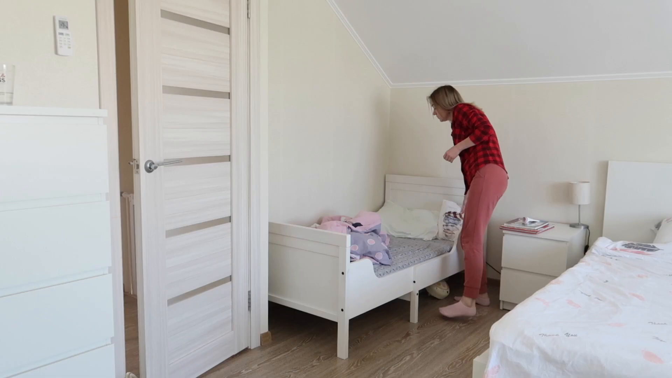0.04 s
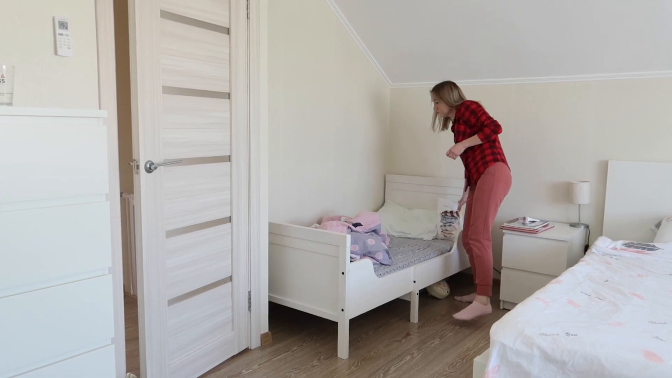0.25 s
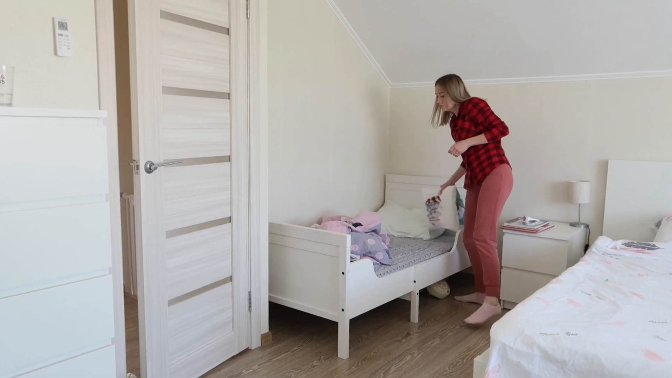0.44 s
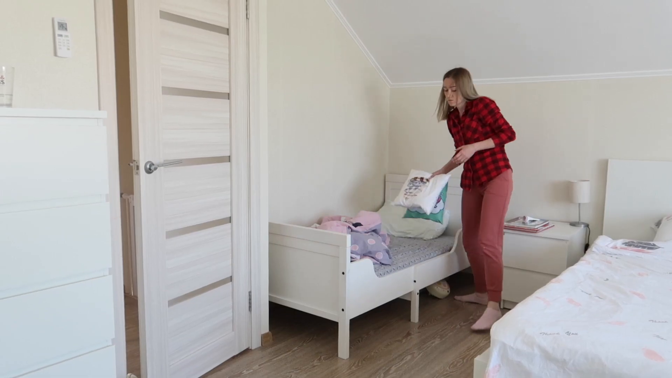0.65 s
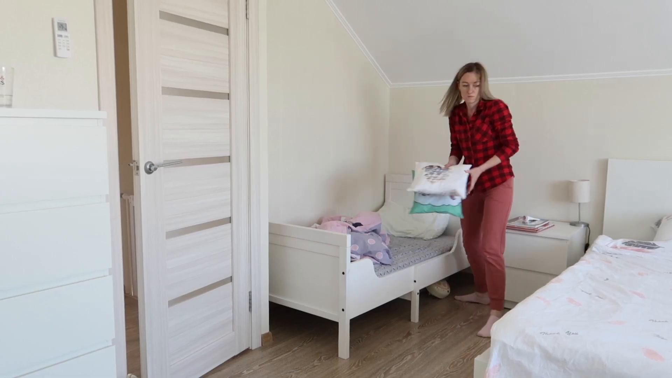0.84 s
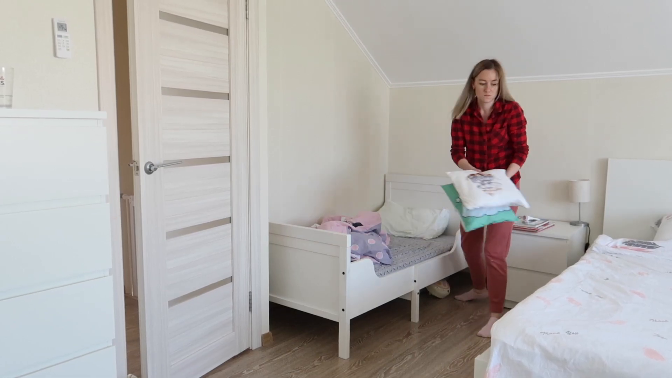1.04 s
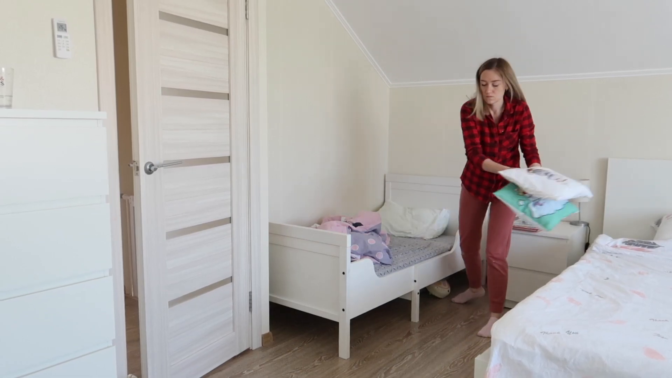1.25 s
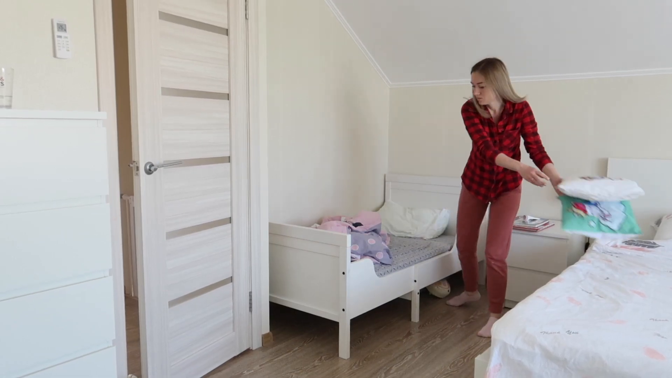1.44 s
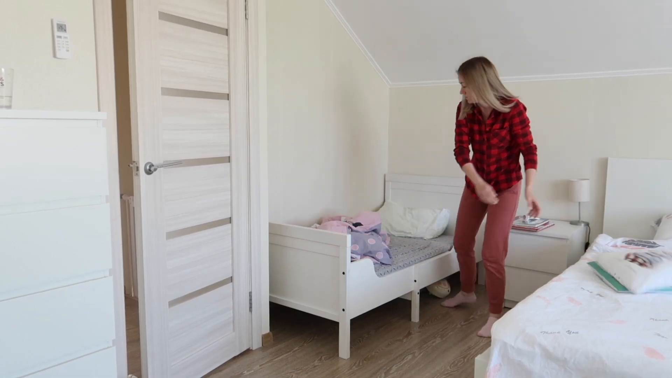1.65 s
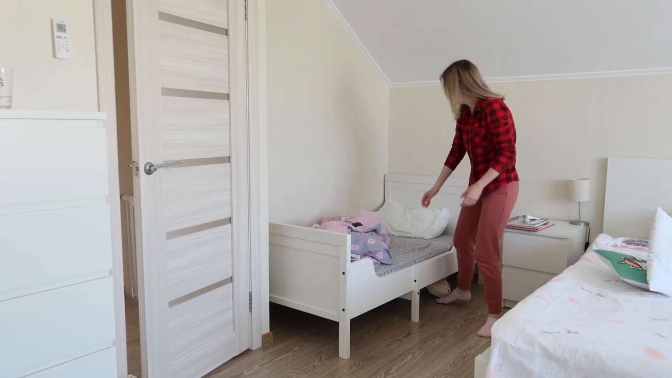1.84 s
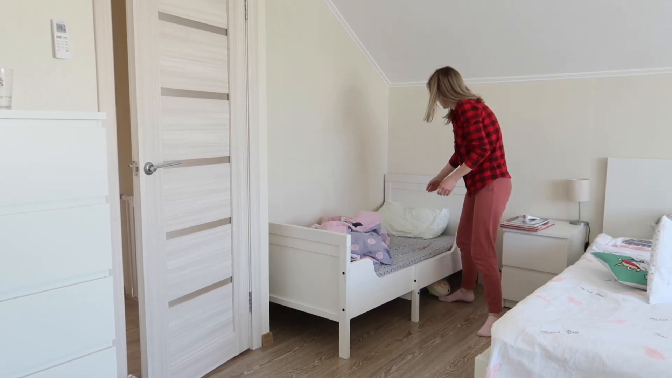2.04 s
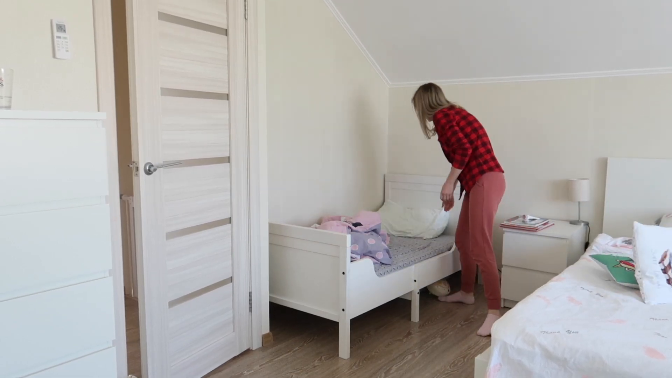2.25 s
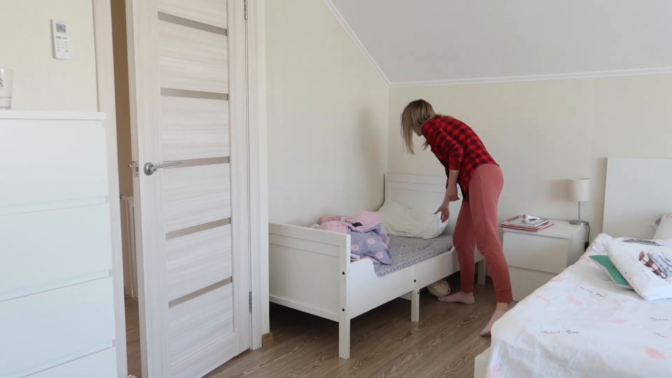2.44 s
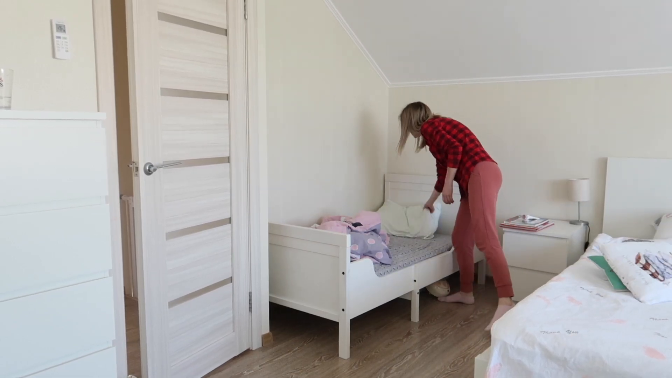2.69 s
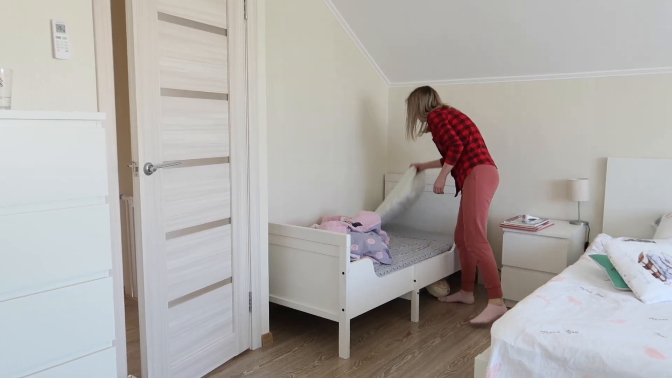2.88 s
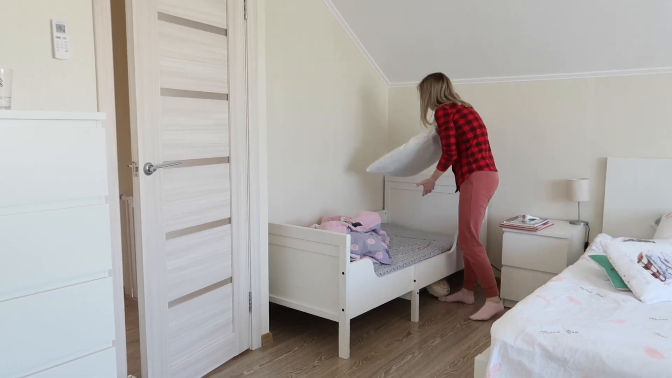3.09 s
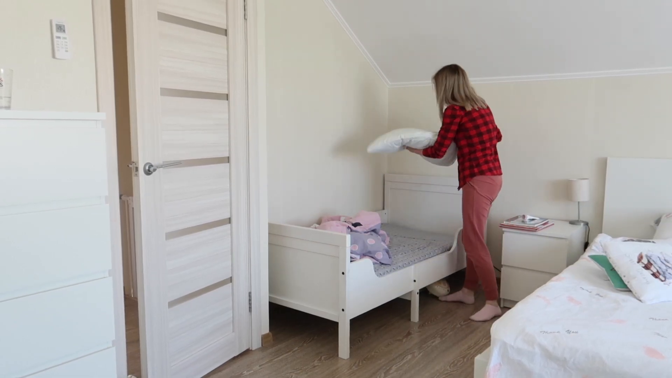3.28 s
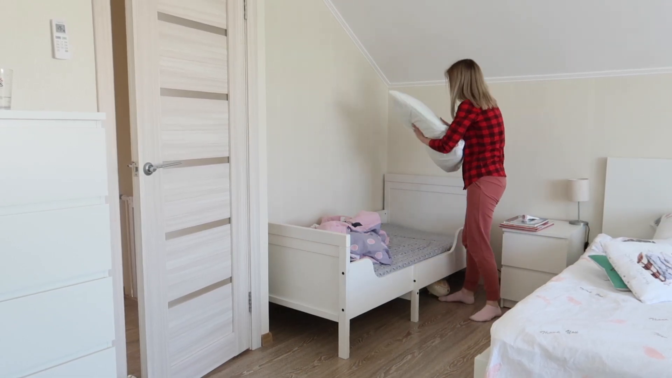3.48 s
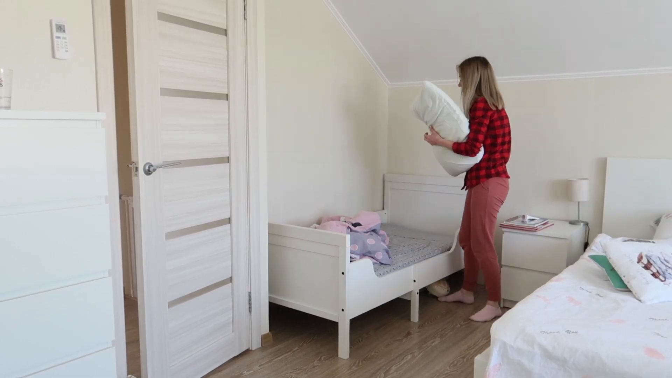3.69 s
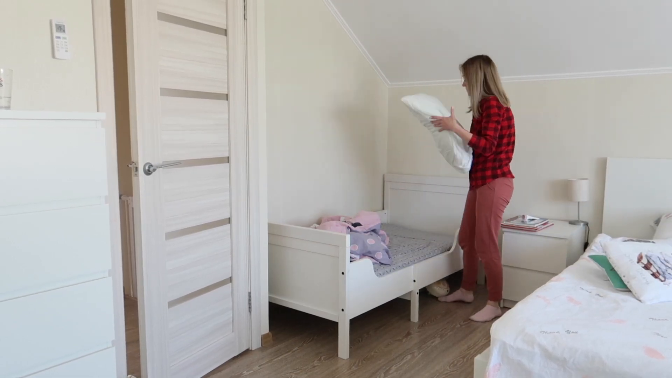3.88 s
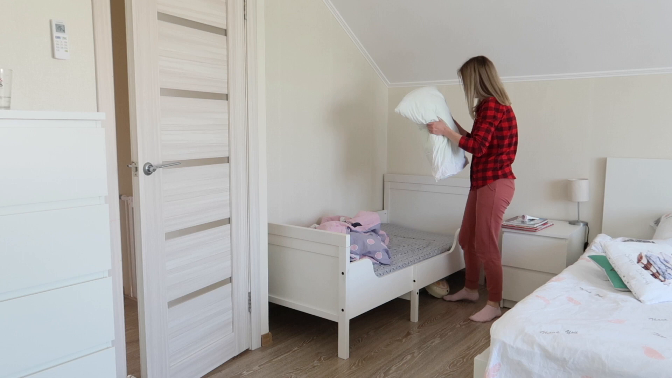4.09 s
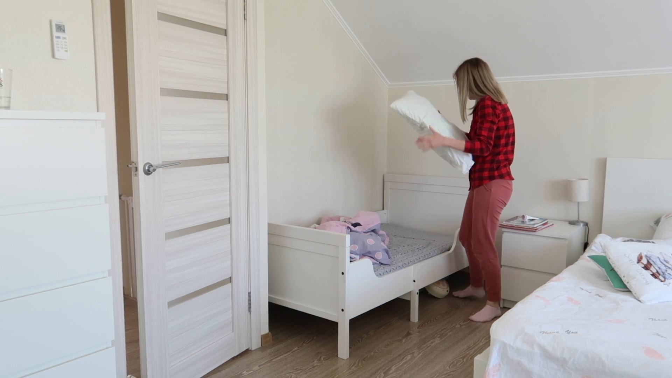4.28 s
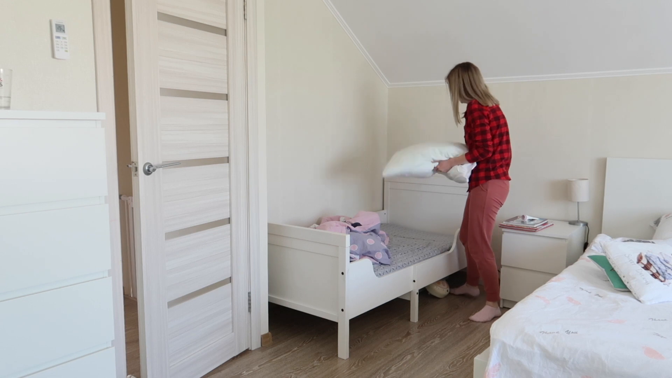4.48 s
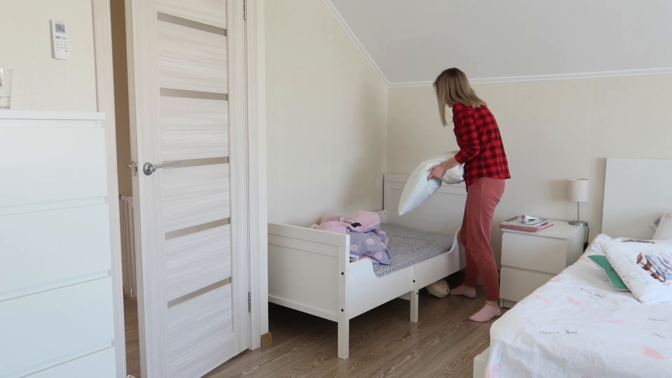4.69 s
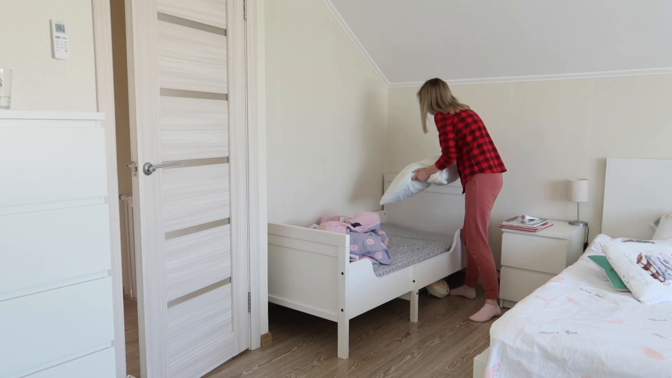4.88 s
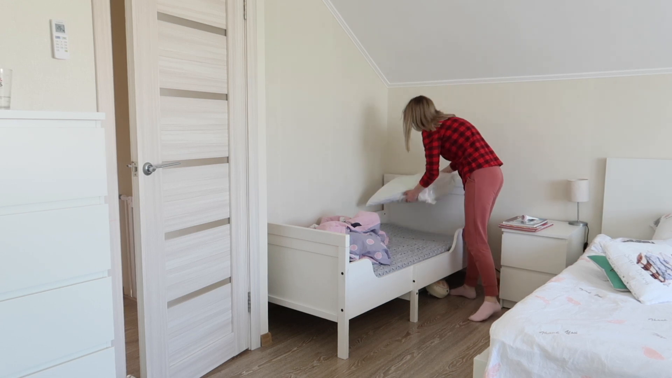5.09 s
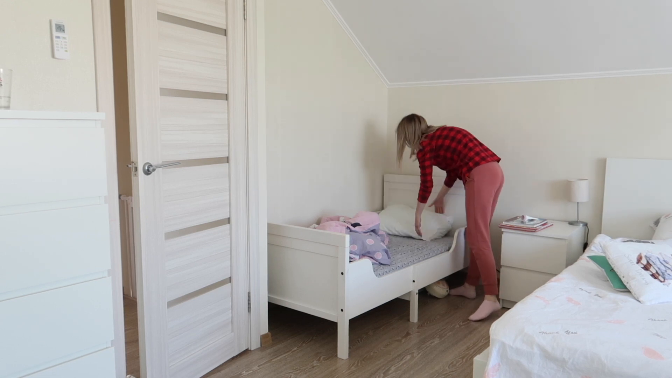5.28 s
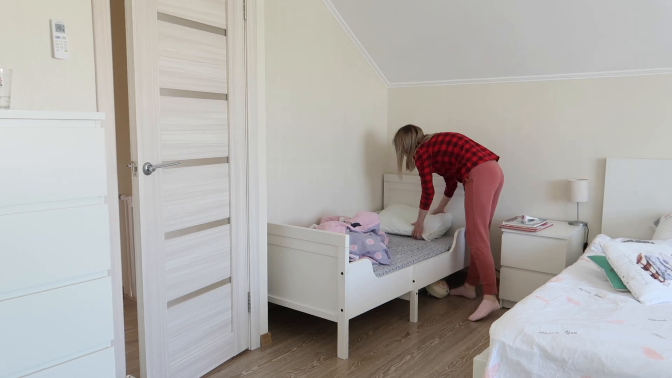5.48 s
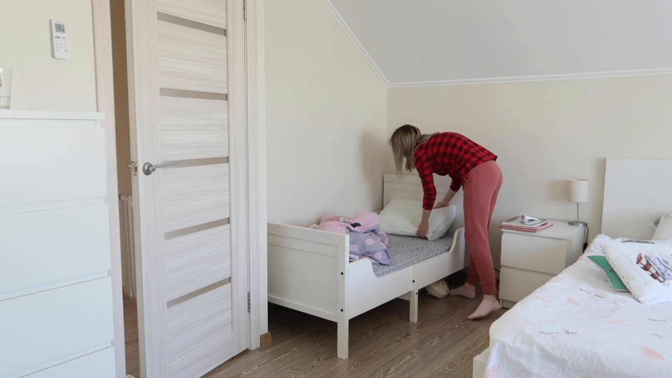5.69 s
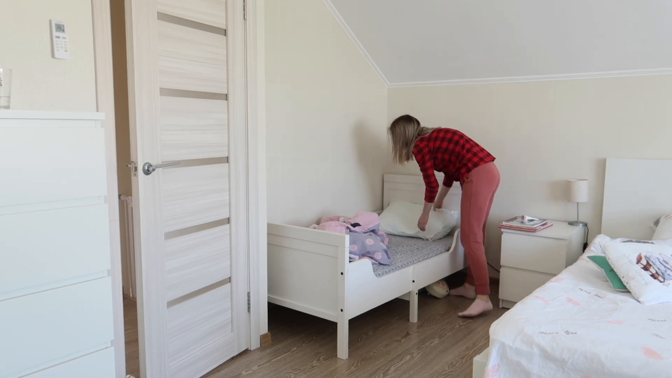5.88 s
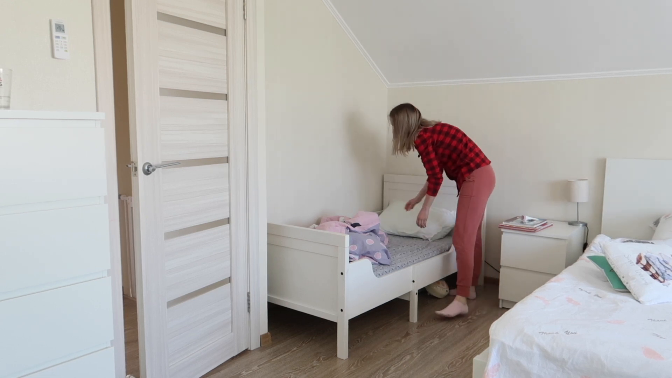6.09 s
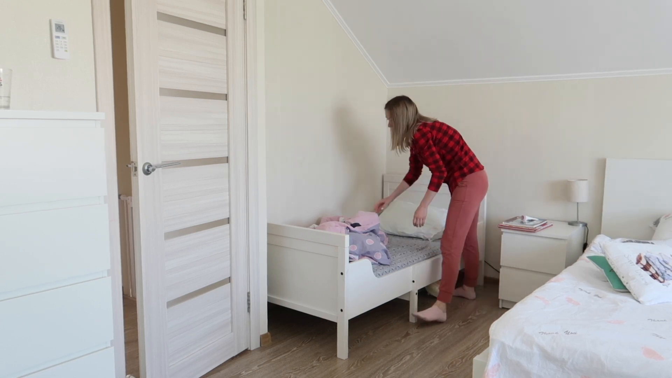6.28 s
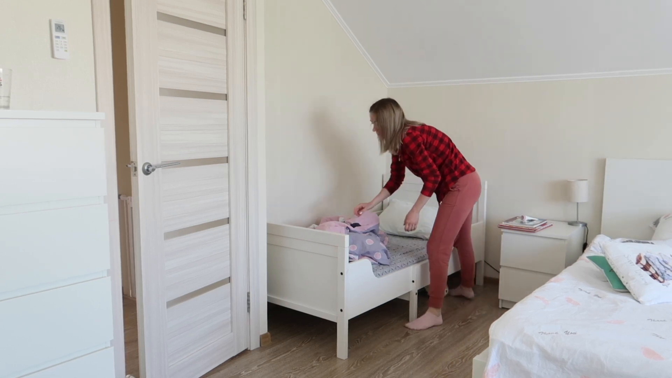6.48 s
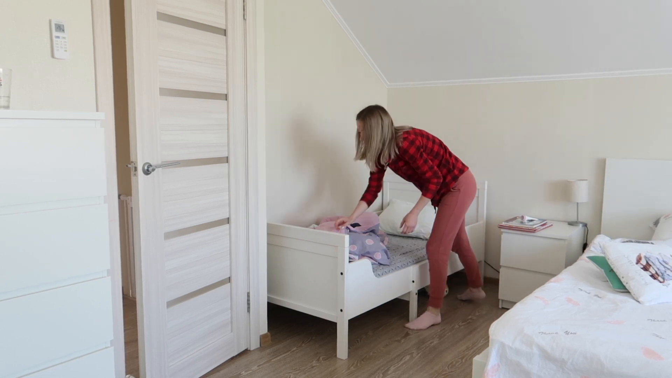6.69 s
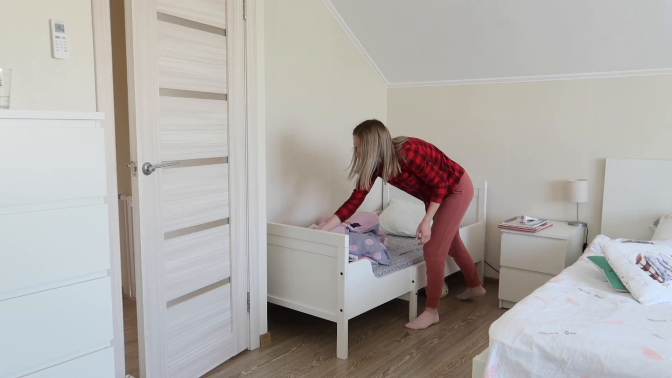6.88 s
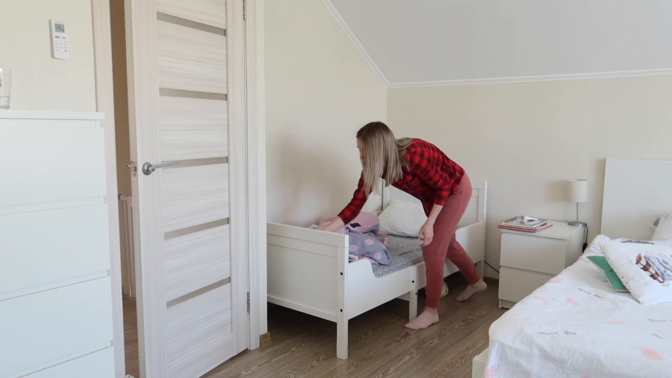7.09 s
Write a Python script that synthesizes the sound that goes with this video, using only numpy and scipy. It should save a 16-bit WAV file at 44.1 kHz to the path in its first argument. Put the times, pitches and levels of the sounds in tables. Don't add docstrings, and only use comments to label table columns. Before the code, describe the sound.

Bed covers hiss and crumple as someone makes beds, dropping and pressing pillows with dull thumps, fabric snaps and low thuds on boards.

```python
import sys
import numpy as np
from scipy import signal
from scipy.fft import rfft, irfft, next_fast_len
from scipy.io import wavfile
from scipy.ndimage import uniform_filter1d

SR = 44100
rng = np.random.default_rng(int(sys.argv[2]) if len(sys.argv) > 2 else 0)


def invert_db(x):
    u = np.asarray(x, float) / 20
    return 10 ** u


def transcribe(u):
    v = np.clip(np.atleast_2d(u).T, -1, 1)
    q = np.round(v * 32767).astype(np.int16)
    wavfile.write(sys.argv[1], SR, q)


N = 314962

# freq_hz, density_db
HUM_SPECTRUM = [(14, -13), (30, -4), (50, -4), (70, -9), (105, 4), (270, -10), (500, -9.5), (1200, -18.5),
                (2400, -19), (5000, -26.5), (10000, -35.5), (15400, -42.5)]
# freq_hz, density_db
HISS_SPECTRUM = [(35, -44), (60, -11), (155, 6), (231, 8), (271, 10.5), (403, 9.5), (671, 5), (3920, -4),
                 (11700, -18), (15400, -29)]
HUM_DB, HISS_DB = -53.5, -56
# pitch_hz, width_hz, level_db, drift_db_per_s
DRONES = [(264.4, 10.4, -57.5, -1.96), (197.5, 9.3, -69.5, -0.1), (876, 13, -64.5, -1.8),
          (425, 6.3, -69, -0.7)]
# time_s, level_db
SWAY = [(0.0, -62), (0.36, -62), (1.15, -55), (1.39, -58), (1.93, -56.5), (2.64, -58), (3.36, -64),
        (3.96, -60), (4.39, -61), (5.05, -68), (5.55, -48), (6.1, -68), (6.38, -60), (6.56, -45.5),
        (7.04, -60.5), (7.14, -60)]

# freq_hz, density_db
FIBRE_SPECTRUM = [(500, -53), (1300, -6), (2500, -2.5), (4200, -8), (6000, -15), (9000, -43)]
# freq_hz, density_db
SHEEN_SPECTRUM = [(3500, -7), (6000, 2), (8000, -1.5), (12000, -14), (14000, -54)]
# time_s, hiss_db, tautness_db, bulk_db
DRAG = [
    (0.0, -43.5, -32, -3),
    (0.09, -48.5, -7, 1.5),
    (0.15, -45.5, -6, 4),
    (0.22, -41.5, -5.5, -0.5),
    (0.33, -45.5, -2, 0.5),
    (0.42, -45, -2, -2.5),
    (0.5, -45.5, -4, -9),
    (0.53, -54.5, -10, 13),
    (0.6, -67, -9, 5),
]
# peak_s, hiss_db, length_s, tautness_db, bulk_db
STROKES = [(0.588, -57, 0.08, -7, 6.5), (0.745, -59.5, 0.28, -14, 2), (0.924, -56.5, 0.15, -12, 3),
           (1.015, -56, 0.14, -11, 3.5), (1.2, -59, 0.44, -13, 2.5), (1.42, -53.5, 0.17, -10, 2.5),
           (2.25, -64, 0.24, -15, 8), (2.452, -64, 0.5, -14, 4.5), (2.717, -51, 0.12, -16, 6.5),
           (2.842, -53.5, 0.18, -11, 4.5), (2.938, -56.5, 0.14, -15, 4.5), (3.182, -61.5, 0.49, -8, 6),
           (3.934, -59, 0.14, -20, 6), (4.025, -59, 0.23, -17, 7), (4.266, -53.5, 0.18, -16, 2),
           (4.455, -53.5, 0.054, -12, 11), (5.43, -56, .03, -10, -1), (4.607, -52.5, 0.093, -12, 6.5),
           (4.94, -61, 0.11, -11, 3), (5.217, -57.5, 0.26, -7.5, 3.5), (5.307, -49, 0.094, -13, 7),
           (5.585, -58, 0.2, -7.5, 10.5), (5.815, -57.5, 0.32, -4.5, 2.5), (6.576, -53.5, 0.063, -24, -2),
           (6.688, -51, 0.16, -17, -2), (7, -60, 0.054, -20, 7)]
STROKE_RISE_SHARE, STROKE_SHARPNESS = 0.41, 1.38
# start_s, hiss_db, bulk_db
SETTLES = [
    (1.7, -57.5, 9),
    (2.73, -55, 2),
    (3.27, -46.5, 6),
    (3.63, -47.5, 9),
    (4.48, -59, 12),
    (5.36, -49.5, 2),
    (6.43, -52.5, 3.5),
]
SETTLE_T60_S, SETTLE_TAUT_DB = 0.86, -23
FIDGET_DB, FIDGET_TAUT_DB, FIDGET_BULK_DB = -70.5, -8.5, 5
STUFFING_DB, STUFFING_LUMPS_DB = -0.5, 1.6
# start_s, level_db, pitch_hz, length_s
SCRAPES = [(0.0, -54, 3740, .08), (.17, -53, 2410, 0.15), (.29, -61, 5870, 0.1), (3.219, -55, 3980, 0.022),
           (3.273, -50, 2530, 0.062), (3.28, -58, 4100, 0.031), (4.23, -62, 5000, 0.057),
           (4.435, -56, 2600, 0.056), (5.205, -52, 3700, .03), (5.363, -49, 4800, 0.022),
           (5.187, -57, 5000, 0.1), (0.09, -50, 2200, 0.051), (.23, -52, 2500, 0.056),
           (.385, -48, 3760, .03), (.58, -56, 5100, .025), (.85, -58, 3200, 0.028), (.908, -56, 2680, .025),
           (.92, -61, 5400, 0.028), (1.0, -61, 5500, 0.036), (1.058, -60, 1420, .025),
           (1.135, -59, 1780, 0.023), (1.21, -63, 4000, .03), (1.383, -55, 2410, .03),
           (1.43, -55, 1810, .04), (2.338, -58, 3240, 0.023), (2.82, -55, 1500, 0.023),
           (2.83, -56, 2600, 0.028), (3.94, -57, 2400, .04), (4.22, -59, 2900, .03),
           (4.455, -61, 4300, .02), (6.645, -57, 3100, .03), (6.695, -57, 3620, .025),
           (7.01, -57, 1740, .025), (6.43, -55, 4200, .05), (6.415, -53, 3300, .04),
           (6.973, -50, 1700, .03), (3.275, -44, 1500, .06), (5.237, -49, 5100, .02), (.15, -44, 1250, .03),
           (3.606, -37, 2000, .03), (3.607, -44, 4200, .015), (.12, -48, 1200, .05), (5.562, -54, 900, .05),
           (6.55, -60, 2800, 0.064), (6.628, -56, 4000, .05), (6.67, -66, 3400, .06), (6.72, -52, 750, .07)]
SCRAPE_WIDTH_SHARE = 0.28

# start_s, peak_db, pitch_hz, t60_s,
# rise_s
THUDS = [(0.278, -30, 113, 0.17, 0.004), (0.85, -34, 111, 0.16, 0.0048), (0.985, -32, 31.8, 0.49, 0.023),
         (1.069, -31.5, 33, 0.33, 0.028), (1.683, -22.5, 85.4, 0.25, 0.014),
         (1.739, -33, 189, 0.17, 0.0066), (2.248, -37, 27.4, 0.31, 0.013), (2.349, -41, 26.9, 0.22, 0.011),
         (2.722, -35, 149.6, 0.4, 0.02), (2.931, -35, 132.6, 0.13, 0.0047),
         (3.242, -14.5, 85.6, 0.15, 0.0068), (3.607, -23, 150, 0.18, 0.03),
         (4.459, -27.5, 105.4, 0.26, 0.012), (4.703, -40, 40, 0.25, 0.017), (5.328, -3, 107, 0.14, 0.015),
         (5.372, -24.5, 130, 0.2, 0.02), (5.517, -33, 110, 0.13, 0.0056), (5.649, -38, 95.5, 0.16, 0.0081),
         (6.402, -14.5, 44.5, 0.16, 0.023), (6.51, -26, 35, 0.3, 0.015), (0.001, -35, 167, 0.18, 0.0081),
         (.225, -36, 115, 0.33, 0.022), (.375, -38, 119.7, 0.25, 0.022), (3.925, -40, 166.5, 0.21, 0.01),
         (1.68, -28.5, 40, 0.4, 0.022), (3.239, -29, 44, 0.34, 0.0062), (3.61, -40, 40.2, 0.34, .01),
          (5.308, -25.5, 41, 0.52, 0.014), (5.3495, -17.5, 110, 0.2, 0.006), (4.5, -35, 88, 0.18, .012),
          (4.53, -42, 55, .2, .015), (4.78, -42, 95, .15, .01), (2.9, -40, 82, .2, .012),
          (0.86, -38, 48, .15, .012), (5.86, -42, 60, .15, 0.011), (6.4155, -22, 86, 0.14, 0.01),
          (6.455, -25, 41, 0.25, 0.012), (6.96, -40.5, 42, 0.36, 0.031)]
# start_s, peak_db, knee_hz, slope_db_per_octave, contact_s
SLAPS = [(.087, -44, 2380, -8, 0.018), (.514, -39, 1600, -7, 0.022), (.594, -40.5, 5060, -8, 0.0061),
         (1.648, -44, 2000, -4, .018), (1.689, -34.5, 2400, -7, 0.018), (2.197, -39, 2500, -7.5, 0.0079),
         (2.72, -36, 2000, -5.5, .008), (3.247, -29, 3500, -16, 0.007), (3.61, -18, 2050, -8, 0.0094),
         (1.698, -40, 4200, -10, 0.011), (3.915, -49, 2500, -14, .016), (4.452, -39.5, 2600, -10, 0.02),
         (4.932, -45.5, 3000, -5.5, 0.0079), (5.193, -41.5, 3000, -12, 0.024),
         (5.24, -27.5, 2500, -9.5, 0.012), (5.241, -38.5, 4800, -19, 0.015),
         (5.336, -22.5, 4800, -25, 0.006), (5.369, -35, 4600, -16, .007), (5.3345, -23.5, 2130, -10, 0.007),
         (6.4135, -26, 4300, -14, 0.006), (6.418, -37, 3900, -16, 0.025), (6.968, -33, 2600, -11, 0.004)]
SLAP_RISE_MIN_S, SLAP_RISE_SHARE = 0.0032, 0.29
# start_s, peak_db, pitch_hz, t60_s
POPS = [(.115, -37, 560, .09), (.13, -39, 910, .07), (1.641, -28.5, 438, 0.13), (1.66, -30, 450, .12),
        (1.673, -28.5, 527, .08), (1.69, -20.5, 471, 0.096), (1.701, -25, 380, .08),
        (1.712, -20.5, 202.5, 0.16), (1.724, -24, 160, .12), (1.772, -33, 200, 0.11),
        (2.721, -29.5, 1273, 0.035), (2.721, -34, 750, .05), (2.731, -33.5, 440, .08),
        (2.748, -39, 350, 0.084), (2.758, -46, 1300, .04), (2.788, -39, 250, .06), (3.252, -21, 410, 0.097),
        (3.249, -28, 1380, .025), (3.256, -26, 823, .04), (3.29, -28, 558, .09), (3.345, -34, 515, .08),
        (3.612, -26, 617, 0.064), (3.655, -31, 900, .05), (3.64, -29, 280, .12), (3.923, -42, 830, .05),
        (4.016, -43, 1360, 0.037), (.149, -38, 1420, .06), (1.815, -41, 423, .08), (3.262, -17, 236.6, 0.1),
        (3.256, -33, 2466, 0.056), (3.66, -28, 260, 0.085), (4.44, -47, 1300, .06), (4.463, -34, 432, .08),
        (4.474, -36, 800, 0.063), (4.485, -31, 280, .08), (4.503, -32, 250, .1), (4.52, -36, 240, .1),
        (5.24, -36, 2400, .05), (5.244, -40, 1500, .05), (5.298, -41, 1760, .04),
             (5.336, -33, 1680, 0.037), (5.514, -32, 150, 0.083), (5.54, -33, 200, 0.066),
             (5.563, -39, 850, .06), (5.567, -39, 229, .06), (5.583, -41, 896, 0.074),
             (5.587, -41, 422, .08), (5.594, -37, 160, 0.065), (5.645, -36, 131, .08),
             (5.605, -44, 523, .07), (.163, -35, 1150, .06), (5.242, -39, 3600, .05),
             (5.245, -41, 5000, .04), (3.31, -30, 270, .1), (3.3, -34, 900, .1), (4.56, -42, 440, .1),
             (4.6, -42, 470, .08), (2.739, -33, 400, .05), (5.242, -39, 3600, .05), (5.245, -41, 5000, .04),
             (3.31, -30, 270, .1)]
POP_RISE_TURNS, POP_SAG, POP_TWIN_RATIO = 1.34, 0.078, 1.13
KNOCK = -33.5, [(506, 1.5, 0.087), (1120, 6.5, 0.065), (1380, 6.5, 0.054)]
KNOCK_S = 0.152
# pitch_hz, width_hz, level_db
PILLOW = [(241, 200, 18), (399, 46, 15), (646, 64, 9), (870, 130, -41.5), (1300, 200, 1), (2300, 300, -39)]
# start_s, peak_db, pitch_hz,
# hardness_0_to_1, t60_s
PUFFS = [(0.155, -34, 504, 0.9, .08), (0.513, -32.5, 690, 0.51, 0.1), (0.852, -37, 203, 0.46, 0.13),
         (1.641, -29, 330, 0.4, 0.17), (1.689, -24.5, 332, 0.36, 0.17), (1.708, -23, 251, 0.7, 0.17),
         (1.749, -33, 416, 0.2, 0.19), (2.721, -22.5, 240, 0.7, 0.11), (2.907, -35, 231, 0.78, 0.11),
         (2.94, -39, 274, 0.85, 0.12), (3.243, -18.5, 590, 0.2, 0.1), (3.609, -13.5, 615, 0.38, 0.092),
         (3.917, -35.5, 374, 0.2, 0.11), (4.012, -39, 405, 0.3, 0.14), (4.056, -38, 255, 0.75, 0.25),
         (4.463, -25.5, 258, 0.41, 0.2), (4.628, -46, 261, 0.4, 0.13), (5.246, -27, 600, 0.32, 0.16),
         (5.334, -22.5, 279, 0.5, .14), (5.37, -26.5, 410, 0.2, 0.093), (5.518, -41, 200, 0.5, 0.11),
         (5.589, -35.5, 407, 0.46, 0.11), (5.649, -40.5, 199, 0.9, 0.12), (5.842, -37.5, 225, 0.4, 0.093),
         (6.413, -37, 205, 0.49, 0.29), (6.97, -40, 196, 0.38, 0.12), (3.256, -15.5, 265, 0.4, 0.088),
           (3.625, -20, 253, 0.64, 0.17), (2.726, -28, 418, 0.8, 0.14), (3.252, -20, 196, 0.65, 0.11),
           (1.642, -34, 1030, 0.9, 0.1), (1.662, -26, 426, 0.2, .2), (3.25, -26, 566, 0.61, 0.09),
           (4.485, -29, 464, 0.31, 0.11), (2.721, -36, 735, 0.54, 0.08), (3.255, -16, 340, 0.8, 0.1),
           (3.258, -19, 186, 0.78, 0.11), (5.575, -38.5, 280, 0.65, 0.16)]
SOFT_RISE_S, HARD_RISE_S = 0.013, 0.0031
# start_s, peak_db, pitch_hz
SNAPS = [(1.6935, -23, 500), (1.7035, -19, 500), (1.7265, -22, 300), (1.666, -30, 1100),
         (2.7195, -28.5, 500), (2.7232, -26, 1100), (5.596, -34, 500), (5.571, -37, 500), (5.61, -37, 600),
         (3.2503, -23, 900), (3.252, -9.5, 900), (3.2567, -15.5, 800), (3.6145, -15, 1100),
         (3.62, -18, 900), (3.6365, -19, 600), (4.4655, -29, 900), (4.488, -28, 600), (5.197, -38, 2700),
         (5.2405, -29, 2400), (5.247, -32, 3600), (5.252, -34, 1800), (5.3385, -23, 3800),
         (6.4135, -31, 4100), (6.424, -34, 3600), (6.4235, -45, 11000), (6.415, -42, 6000),
         (6.9685, -36, 2700), (6.9683, -43, 5000), (3.251, -30, 3800)]

# freq_hz, t60_s
ROOM_DECAY = [(80, 0.29), (210, 0.31), (560, 0.41), (1470, 0.32), (3000, 0.34), (6000, 0.3), (12000, 0.39)]
# freq_hz, side_minus_mid_db
ECHO_WIDTH = [(60, -56), (110, -64), (200, -43), (380, -23), (700, -27), (1290, -18.5), (2380, -19.5),
              (4390, -9), (8110, 0.5), (15000, 4.5)]
EDGE_HZ = 15300


def evened(x):
    return x / np.sqrt(np.mean(x ** 2) + 1e-20)


def read(points, hz):
    f_hz, value = np.transpose(points)
    return np.interp(np.log(hz + 1), np.log(f_hz + 1), value)


def colour(x, points):
    n = next_fast_len(x.shape[-1])
    gain = invert_db(read(points, np.fft.rfftfreq(n, 1 / SR)))
    return irfft(rfft(x, n) * gain, n)[..., :x.shape[-1]]


def band(x, lo_hz, hi_hz):
    return signal.sosfilt(signal.butter(2, [lo_hz, hi_hz], "band", fs=SR, output="sos"), x)


def resonate(x, hz, width_hz):
    turn = np.exp(2j * np.pi * np.cumsum(hz * np.ones(len(x))) / SR)
    r = np.exp(-np.pi * width_hz / SR)
    return 2 * (turn * signal.lfilter([1 - r], [1, -r], x / turn)).real


def resonate_twice(x, hz, width_hz):
    return resonate(resonate(x, hz, width_hz), hz, width_hz)


def add(mix, start_s, sound):
    part = mix[max(round(start_s * SR), 0):][:len(sound)]
    part += sound[:len(part)]


def time_s(length_s):
    return np.arange(round(length_s * SR)) / SR


def swell(t, rise_s):
    return np.sin(np.pi / 2 * np.minimum(t / max(rise_s, .001), 1)) ** 2


def drift(seconds):
    size = max(round(seconds * SR), 1)
    return evened(uniform_filter1d(uniform_filter1d(rng.standard_normal(N), size), size))


def stillness():
    noise, t = rng.standard_normal((3, N)), np.arange(N) / SR
    middle = invert_db(HUM_DB + 1.0 * drift(0.17)) * evened(colour(noise[0], HUM_SPECTRUM))
    for hz, width_hz, db, drift_db_per_s in DRONES:
        middle = middle + invert_db(db + drift_db_per_s * t) * evened(resonate_twice(noise[1], hz, width_hz))
    return np.array([middle, invert_db(HISS_DB) * evened(colour(noise[2], HISS_SPECTRUM))])


def boards():
    level = invert_db(np.interp(np.arange(N) / SR, *np.transpose(SWAY)))
    return level * evened(band(rng.standard_normal(N), 24.0, 60))


def motion():
    t = np.arange(0, N, 64) / SR
    s, hiss_db, taut_db, bulk_db = np.transpose(DRAG)
    drag = invert_db(np.interp(t, s, hiss_db, right=-120))
    moves = [(drag, np.interp(t, s, taut_db), np.interp(t, s, bulk_db)),
             (invert_db(FIDGET_DB), FIDGET_TAUT_DB, FIDGET_BULK_DB)]
    for peak_s, db, length_s, taut_db, bulk_db in STROKES:
        share = np.where(t < peak_s, STROKE_RISE_SHARE, 1 - STROKE_RISE_SHARE)
        late = (t - peak_s) / (length_s * share)
        moves.append((invert_db(db) * np.exp(-abs(late) ** STROKE_SHARPNESS), taut_db, bulk_db))
    for start_s, db, bulk_db in SETTLES:
        since = np.maximum(t - start_s, 0)
        fall = invert_db(db - 60 * since / SETTLE_T60_S) * swell(since, 0.012)
        moves.append((fall, SETTLE_TAUT_DB, bulk_db))
    power = np.zeros((3, len(t)))
    for gain, taut_db, bulk_db in moves:
        power[0] += gain ** 2
        power[1] += (gain * invert_db(taut_db)) ** 2
        power[2] += (gain * invert_db(bulk_db)) ** 2
    return [np.interp(np.arange(N) / SR, t, np.sqrt(p)) for p in power]


def slips(per_s, spread_db, clump_db, clump_s):
    size = invert_db(spread_db * np.minimum(rng.exponential(1, N), 4)) * rng.standard_normal(N)
    return size * (rng.random(N) < per_s / SR) * invert_db(clump_db * drift(clump_s))


def scrapes(threads):
    out = np.zeros(N)
    for start_s, db, hz, length_s in SCRAPES:
        part = threads[max(round(start_s * SR), 0):][:round(length_s * SR)]
        ring = resonate_twice(part, hz, SCRAPE_WIDTH_SHARE * hz)
        add(out, start_s, invert_db(db) * evened(ring) * np.sqrt(np.hanning(len(part))))
    return out


def cloth():
    hiss, sheen, crumple = motion()
    threads = slips(24000, 0.96, 1.0, 0.015)
    weave_hz = 3000 * np.exp(0.26 * drift(0.08))
    weave = evened(resonate(threads, weave_hz, 540))
    fibres = evened(evened(colour(threads, FIBRE_SPECTRUM)) + 0.48 * weave)
    taut = evened(resonate(threads, 5700 * 3000 / weave_hz, 700))
    gloss = evened(evened(colour(threads, SHEEN_SPECTRUM)) + 0.5 * taut)
    folds = evened(band(band(slips(4000, 2.2, 2.4, .025), 230, 1500), 200, 2000))
    stuffing = evened(band(slips(900, 2.2, 1.6, 0.037), 65, 254))
    heave = crumple * invert_db(STUFFING_DB + STUFFING_LUMPS_DB * drift(0.096))
    return hiss * fibres + sheen * gloss + crumple * folds + heave * stuffing + scrapes(threads)


def thud(db, hz, t60_s, rise_s):
    t = time_s(.7)
    turns = hz * (t + 0.16 * 0.032 * (1 - np.exp(-t / 0.092)))
    return invert_db(db - 60 * t / max(t60_s, .03)) * swell(t, rise_s) * np.sin(2 * np.pi * turns)


def slap(db, knee_hz, slope_db, contact_s):
    t = time_s(.15)
    tone = [(knee_hz / 4, -14), (knee_hz / 2, -3), (knee_hz / 1.43, -3), (knee_hz, 3), (1.17 * knee_hz, -3),
            (2 * knee_hz, slope_db), (6 * knee_hz, 6.1 * slope_db)]
    noise = rng.standard_normal(len(t))
    graininess = evened(uniform_filter1d(rng.standard_normal(len(t)), size=60))
    grains = noise * invert_db(3.6 * graininess)
    envelope = swell(t, SLAP_RISE_MIN_S + SLAP_RISE_SHARE * contact_s) * np.exp(-t / max(contact_s, .001))
    return invert_db(db - 4.0) * evened(colour(grains, tone)) * envelope


def pop(db, hz, t60_s):
    t = time_s(.25)
    turns = hz * (t + POP_SAG * .012 * (1 - np.exp(-t / .012)))
    ring = np.sin(2 * np.pi * turns) + 0.28 * np.sin(2 * np.pi * POP_TWIN_RATIO * turns)
    return invert_db(db - 60 * t / max(t60_s, .015)) * swell(t, POP_RISE_TURNS / hz + 0.0017) * ring


def knock(db, modes):
    t = time_s(.2)
    ring = sum(invert_db(mode_db - 60 * t / t60_s) * np.sin(2 * np.pi * hz * t) for hz, mode_db, t60_s in modes)
    return invert_db(db) * swell(t, 0.01) * ring


def puff(db, hz, hardness, t60_s):
    t = time_s(.5)
    noise, hardness = rng.standard_normal(len(t)), np.clip(hardness, 0, 1)
    rise_s = SOFT_RISE_S + (HARD_RISE_S - SOFT_RISE_S) * hardness
    pillow = sum(invert_db(level_db) * evened(resonate(noise, f_hz, width_hz)) for f_hz, width_hz, level_db in PILLOW)
    soft = evened(evened(pillow) + 0.2 * evened(band(noise, 120, 1130)))
    patch = evened(resonate_twice(noise, hz, 0.2 * hz))
    body = (1 - hardness) * soft + hardness * patch
    return invert_db(db - 2.5 - 60 * t / max(t60_s, .02)) * evened(band(body, 87, 3400)) * swell(t, rise_s)


def snap(db, hz):
    u = np.pi * hz * (time_s(.008) - .004)
    return -invert_db(db) * (1 - 2 * u ** 2) * np.exp(-u ** 2)


def echoes():
    taps = np.zeros((2, SR // 2))
    slots = np.arange(200, SR // 2 - 20, 20)
    at = slots + rng.integers(0, 20, (2, len(slots)))
    np.put_along_axis(taps, at, rng.choice([-1., 1.], at.shape), 1)
    hz, t, z = signal.stft(taps, SR, nperseg=512)
    decay = invert_db(-60 * t / read(ROOM_DECAY, hz)[:, None])
    tail = signal.istft(z * decay, SR, nperseg=512)[1]
    return tail / np.linalg.norm(tail, axis=1, keepdims=True)


def room(x, wet_db, side_db):
    mid, side = echoes()
    tails = [mid, colour(side, ECHO_WIDTH)]
    mid, side = signal.fftconvolve(x[None], tails, axes=1)[:, :N]
    return np.array([x + invert_db(wet_db) * mid, invert_db(side_db) * side])


def scene():
    places, thuds = np.zeros((3, N)), np.zeros(N)
    blow_kinds = [(SLAPS, .002, slap), (PUFFS, .003, puff), (POPS, 0, pop),
                  (SNAPS, .004, snap)]
    for table, lead_s, source in blow_kinds:
        for k, (start_s, *row) in enumerate(table):
            add(places[k % len(places)], start_s - lead_s, source(*row))
    add(places[0], KNOCK_S, knock(*KNOCK))
    for start_s, *row in THUDS:
        add(thuds, start_s, thud(*row))
    blows = sum(room(place, -5.5, 2.0) for place in places)
    linen = room(cloth() * invert_db(-2.5), -10.0, 0.49)
    mid, side = stillness() + blows + linen + room(thuds, -12.0, -28.0)
    mid = mid + boards()
    return np.array([mid + side, mid - side])


def roll_off(x):
    return signal.sosfilt(signal.butter(12, 15160, fs=SR, output="sos"), x)


def record(dry):
    lowpass = signal.firwin(511, EDGE_HZ, window=("kaiser", 9), fs=SR)
    limited = signal.oaconvolve(dry, lowpass[None], "same")
    return roll_off(limited)


dry = scene()
out = record(dry)
transcribe(out)
```